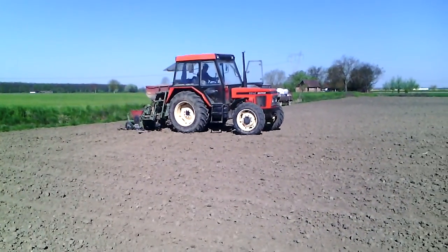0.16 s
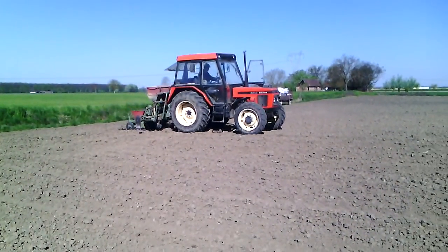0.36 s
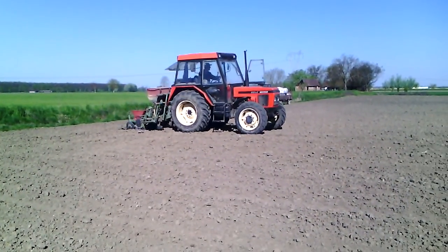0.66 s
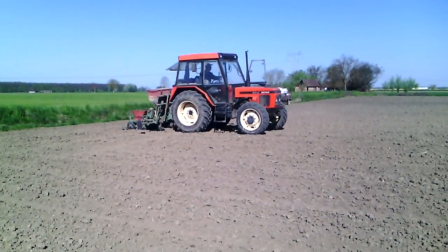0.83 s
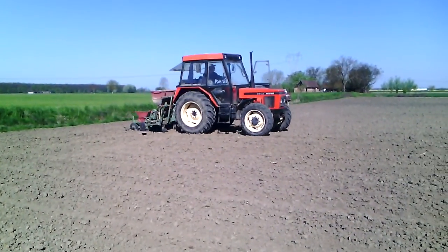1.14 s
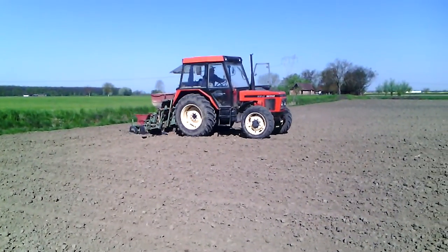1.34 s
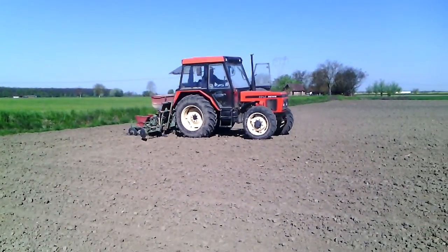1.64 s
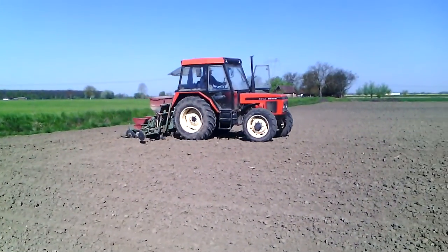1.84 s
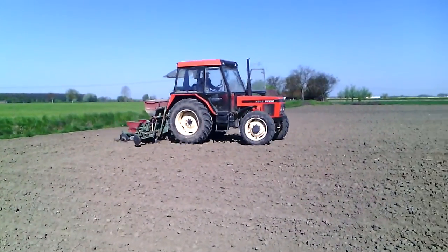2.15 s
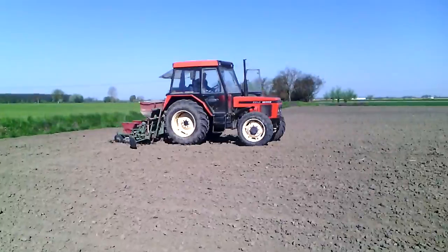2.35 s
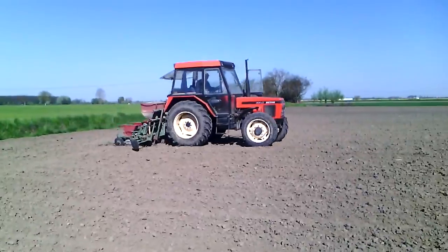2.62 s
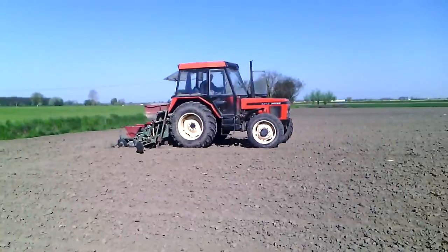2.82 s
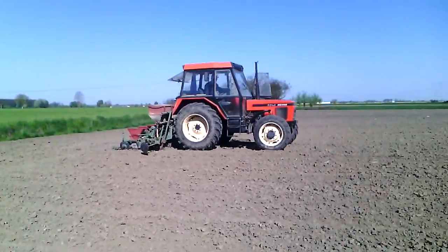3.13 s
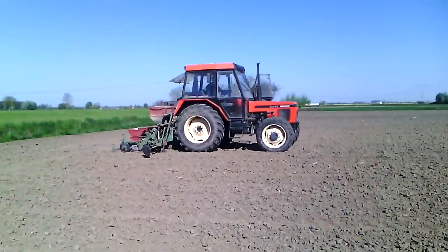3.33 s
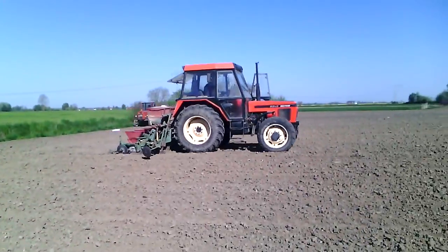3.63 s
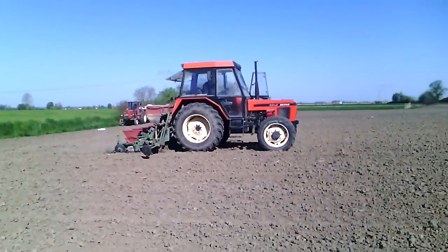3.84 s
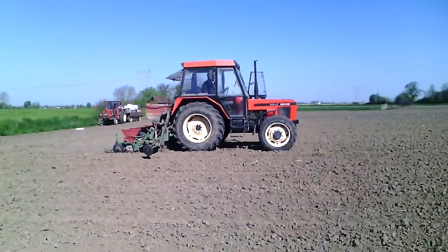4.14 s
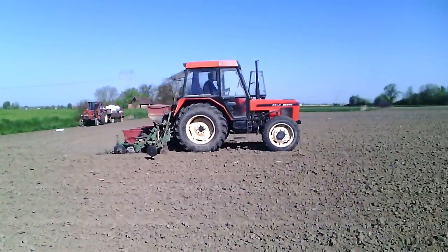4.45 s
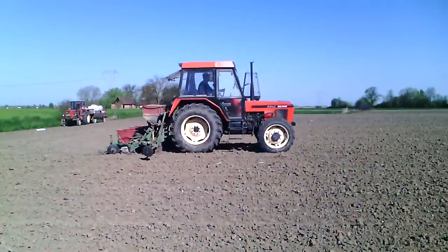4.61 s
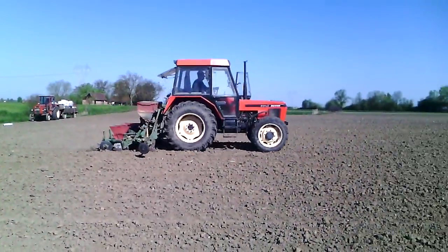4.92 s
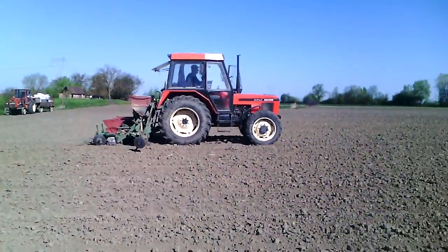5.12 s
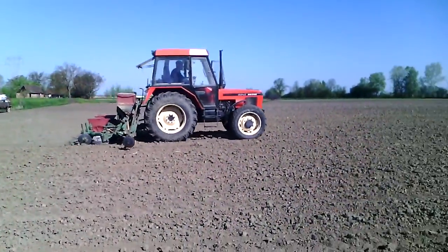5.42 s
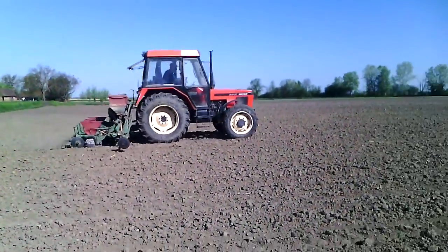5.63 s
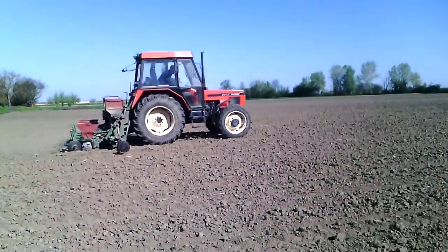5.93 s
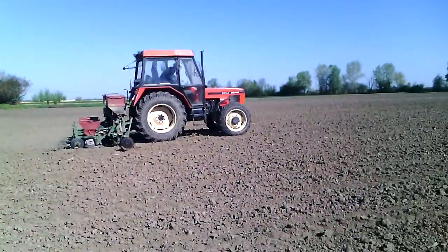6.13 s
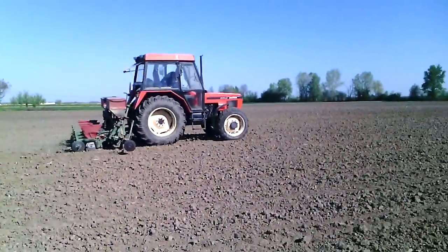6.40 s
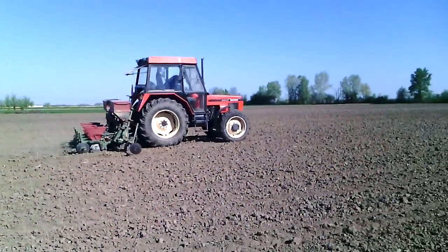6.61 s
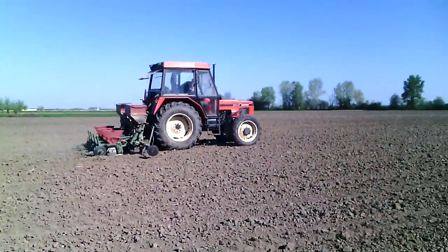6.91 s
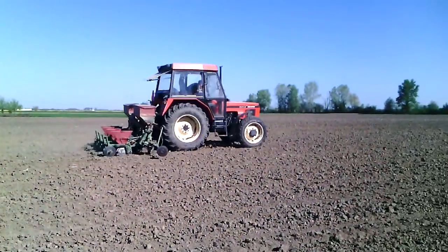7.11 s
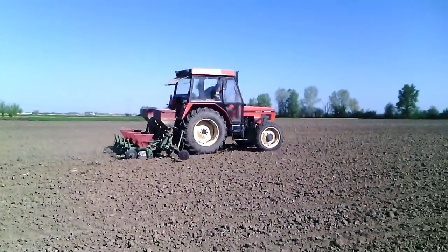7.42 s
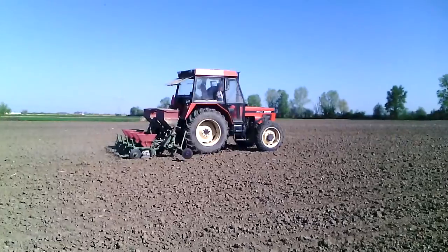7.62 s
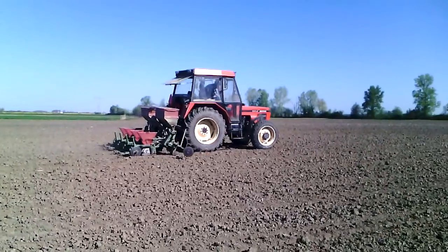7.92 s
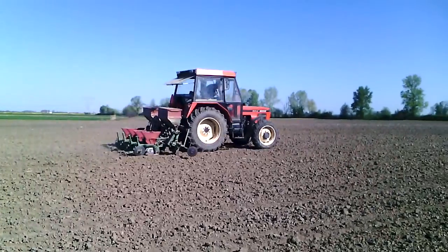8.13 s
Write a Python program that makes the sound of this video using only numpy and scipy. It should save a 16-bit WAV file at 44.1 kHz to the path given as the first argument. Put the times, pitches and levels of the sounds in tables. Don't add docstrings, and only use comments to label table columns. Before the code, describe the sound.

A diesel tractor dips in revs, then pulls hard across a field while its planter clanks, squeaks and rings with bright steel knocks.

```python
import sys
import numpy as np
from scipy import signal
from scipy.fft import rfft, irfft, next_fast_len
from scipy.io import wavfile
from scipy.ndimage import uniform_filter1d

SR = 44100
rng = np.random.default_rng(int(sys.argv[2]) if len(sys.argv) > 2 else 0)


def generate_wav(sig):
    pcm = np.round(np.clip(np.atleast_2d(sig).T, -1, 1) * 32767).astype(np.int16)
    wavfile.write(sys.argv[1], SR, pcm)


def level_to_linear(level):
    exponent = np.asarray(level, float) / 20
    return 10 ** exponent


N = 364266

# (time [s], turning rate [Hz], exhaust hum level [dB], load [dB])
ENGINE = [(0.0, 39.2, -55.5, -7), (0.71, 39.1, -56, -7), (1.59, 32.1, -55.5, -4.5), (1.98, 33.5, -54, -4),
          (2.71, 45.0, -49.5, 0), (3.11, 46.9, -50, 0), (4.07, 49.8, -48.5, 0.6), (5.02, 51.2, -48.5, 0),
          (5.8, 50.4, -49.5, -0.5), (6.99, 47.1, -56, -0.96), (8.26, 50.0, -52, 0.9)]
# (multiple of the turning rate [1], level against the second tone [dB])
UPPER_TONES = [(1.5, -28), (2.5, -27), (3.5, -25), (4, -7.5), (4.5, -17), (5, -9.5), (6, -16.5)]


def engine_hum(t):
    second_db = curves(ENGINE, t)[1]
    first_db = layer_db(t, -63, 1.3, 1.3)
    third_db = second_db + layer_db(t, -5, -0.2, -5)
    angle = engine_angle(t)
    wobble = wander(count=len(UPPER_TONES), per_s=12)
    apart = np.array([[-.12], [.12]]) * wander(count=1, per_s=2.5)[0]
    hum = 0
    for k, db in enumerate([first_db, second_db, third_db]):
        hum = hum + level_to_linear(db + 3.0 + 1.1 * wobble[k]) * np.cos((k + 1) * angle + apart)
    for (order, db), w in zip(UPPER_TONES, wobble):
        hum += level_to_linear(second_db + db + 1.5 + 2.35 * w) * np.cos(order * angle + 0.92 * w[::-1])
    thump_s, thump_half_s, thump_hz = 2.755, .03, 45
    surge_db, push_db = 6.2, -43
    lurch = bump(t, thump_s, thump_half_s)
    thump = level_to_linear(push_db) * lurch * np.cos(2 * np.pi * thump_hz * (t - thump_s))
    return hum * level_to_linear(surge_db * lurch) + thump


# (frequency [Hz], level [dB])
ROAR = [(20, -21), (40, -21), (75, -6), (125, -1.5), (190, 1), (250, -3), (330, -10), (450, -17.5),
        (520, -60)]
# (frequency [Hz], level [dB])
CLATTER = [(260, -26), (450, -11.5), (495, -24), (550, 2.5), (655, 1), (1120, 0.5), (1410, -1.5),
           (1570, 0.5), (2420, -7), (2910, -7.5), (3300, -20.5), (4290, -38), (7260, -120)]
# (frequency [Hz], level [dB])
HISS = [(2900, -13.5), (3280, -15), (3710, -7), (5370, -5), (5990, -9.5), (7110, 0.5), (7870, 1.5),
        (9600, -16.5), (10500, -27), (11500, -37), (12300, -30.5), (13300, -30), (14300, -39), (15000, -46)]


def engine_noise(t):
    firing = engine_angle(t) / (2 * np.pi)
    strength = level_to_linear(3.1 * rng.standard_normal(int(firing[-1]) + 1))
    knock = np.exp(-(firing % 1) / 0.24) * strength[firing.astype(int)]

    roar_db = layer_db(t, -52.5, 0.68, 3.7)
    roar = level_to_linear(roar_db - 0.5) * noise(ROAR, patchy_db=2.0, flicker_db=-1.0, size=2048)
    clatter_db = layer_db(t, -47, 0.93, 0.1)
    clatter = level_to_linear(clatter_db - 1.0) * noise(CLATTER, patchy_db=1.5, flicker_db=1.4)
    clatter = clatter * evened(1 + 0.78 * knock)
    hiss_db = layer_db(t, -45.5, 0.84, 3.86) + 4 * bump(t, 0.42, 0.55)
    hiss = level_to_linear(hiss_db - 3.0) * noise(HISS, patchy_db=2.0, flicker_db=2.0, size=256)
    hiss = hiss * evened(1 + 0.29 * knock)

    air = signal.sosfiltfilt(signal.butter(4, 11500, "high", fs=SR, output="sos"), hiss)
    air_db = layer_db(t, 2.5, 0.27, -6) + 7 * bump(t, 5.0, 2.0)

    hood_hz, hood_width_hz, hood_db = 1570, 30, -62
    idling = np.clip((40 - curves(ENGINE, t)[0]) / 3 + 1.0, 0, 1)
    hood = level_to_linear(hood_db) * evened(resonate(clatter * knock ** 2, hood_hz, hood_width_hz)) * idling
    return hood + roar + clatter + hiss + (level_to_linear(air_db) - 1) * air


# (time [s], hum level [dB], whine frequency [Hz])
GEARS = [
    (4.4, -57, 1052),
    (5.7, -57.5, 1092),
    (6.45, -61.5, 1128),
    (7.2, -58, 1100),
    (7.6, -55.5, 1106),
    (8.0, -57.5, 1131),
    (8.26, -49, 1122),
]


def gearing(t):
    hum_db, hz = curves(GEARS, t)
    a, b = rng.standard_normal((N, 2)).T
    hum = level_to_linear(hum_db - 3.5) * evened(resonate(resonate(a, hz / 2, 11.6), hz / 2, 30))

    shaky_phase = 2 * np.pi * 557 * t + .6 * wander(count=1, per_s=29)[0]
    moan = level_to_linear(hum_db + 16.2) * bump(t, 6.97, 0.085) * np.sin(shaky_phase)
    moan = moan * level_to_linear(1.7 * wander(count=1, per_s=36)[0])

    whine_db = -57.5
    waver_db = evened(uniform_filter1d(uniform_filter1d(a, size=5000), size=5000))
    tone = np.sin(2 * np.pi * np.cumsum(hz) / SR)
    fuzz = 0.5 * evened(resonate(resonate(b, hz, 12), hz, 30))
    whine = level_to_linear(whine_db - 2.5 + waver_db) * behind(t) ** 2 * (tone + fuzz)
    return moan + (hum + whine) * np.clip((t - GEARS[0][0]) / 0.41, 0, 1)


# (start [s], length [s], peak level [dB])
LOOSE_SPELLS = [
    (0.038, .245, -29.5),
    (0.322, .065, -30.5),
    (0.45, .04, -32),
    (0.526, .065, -33.5),
    (.6529, .04, -29),
    (0.757, .04, -32.5),
    (.6295, .01, -35),
    (0.706, .04, -38),
]
# (frequency [Hz], level [dB])
PANEL_MODES = [(6300, -1.5), (6540, 4), (7070, -4.5), (7300, -14), (5700, -14), (6900, -4.5), (7800, -19)]


def panel():
    out, t = np.zeros(N), np.arange(1500) / SR
    slaps = []
    for start, length, db in LOOSE_SPELLS:
        turn_s = 1 / curves(ENGINE, start)[0]
        slaps += [(s, db) for s in np.arange(start, start + length, turn_s)]
    for (s, db), chance in zip(slaps, rng.random((len(slaps), len(PANEL_MODES), 2))):
        for (hz, mode_db), (a, b) in zip(PANEL_MODES, chance):
            level = level_to_linear(db + mode_db - 9.4 * b - 60 * t / 0.026) * (1 - np.exp(-t / 0.0011))
            add(out, s, level * np.sin(2 * np.pi * (hz * (1 + 0.029 * (a - b)) * t + a)))
    return out


# (time [s], peak level [dB], time to fade by 60 dB [s])
DISC_BLOWS = [(2.6063, -37.5, 0.13), (2.7, -32.5, 0.097), (2.8929, -23.5, 0.061), (2.9764, -27, 0.14),
              (3.235, -27, 0.15), (3.329, -29.5, 0.16), (3.4168, -33, 0.26), (3.592, -23, 0.04),
              (3.7075, -25, 0.053), (3.7387, -19, 0.13), (3.781, -21.5, 0.055), (3.862, -24, 0.11),
              (3.9448, -16.5, 0.076), (4.044, -35.5, 0.15), (4.122, -24, 0.049), (4.244, -15, 0.074),
              (4.385, -27.5, 0.061), (4.4842, -17.5, 0.039), (4.545, -23, 0.062), (4.628, -28, 0.13),
              (4.973, -17, 0.073), (5.464, -27.5, 0.077), (5.9706, -34, 0.12), (6.4942, -32.5, 0.13),
              (6.5538, -34, 0.15), (6.606, -34.5, 0.2), (6.672, -25, 0.11), (6.839, -35, 0.086),
              (7.027, -26, 0.11), (7.232, -31.5, 0.057)]
# (time [s], peak level [dB], time to fade by 60 dB [s])
DISC_RUBS = [(1.986, -40.5, 0.097), (2.7742, -31.5, 0.17), (2.8707, -36.5, 0.19), (3.0486, -27, 0.17),
             (3.99, -34, 0.11), (4.4287, -37.5, 0.34), (5.065, -36.5, 0.062), (5.735, -39.5, 0.066),
             (7.5272, -29.5, 0.15), (7.605, -34, .115), (7.8413, -39, 0.052)]


def disc():
    disc_hz, doppler_hz, sag_hz_per_db, scatter_hz = 5563, 44, 5, 43
    out = 0
    for rows, fall, rise in ((DISC_BLOWS, 1.6, .004), (DISC_RUBS, 3.5, .012)):
        hits = []
        for (s, db, t60), a in zip(rows, rng.random(len(rows))):
            hz = disc_hz - doppler_hz * behind(s) - sag_hz_per_db * max(db + 24.5, 0)
            hits.append((s, db, hz + scatter_hz * (a - .5), t60))
        out = out + struck(hits, rise=rise, partner=.013, partner_db=-9, chatter=.36, fall=fall)
    return out


# (frequency [Hz], level [dB])
NEIGHBOURS = [(2570, -18), (3470, -31), (3990, -27), (4470, -35), (6560, -18), (6930, -40), (7620, -18),
              (8580, -27)]


def disc_neighbours():
    rows = DISC_BLOWS + DISC_RUBS
    hits = []
    for row, luck in zip(rows, rng.random((len(rows), len(NEIGHBOURS), 2))):
        for (hz, db), (a, b) in zip(NEIGHBOURS, luck):
            if a < .5:
                level = 0.18 * (row[1] + 30) - 24 + db - 14 * a
                hits.append((row[0] + 0.014 * b, level, hz))
    return struck(hits, rise=0.0038, partner=0.016, partner_db=-2.5, chatter=0.16, ring_s=0.081)


# (time [s], peak level [dB], frequency [Hz], hold [s])
LATE_RINGS = [(1.697, -38, 3800, 0.038), (1.68, -47, 5800, 0.07), (4.27, -33.5, 5540, 0.087),
              (4.8, -42, 2080, 0.064), (4.455, -40, 6560, .05), (4.53, -40, 4450, .13),
              (3.3, -45, 8600, .04), (4.7, -44, 5520, 0.096), (4.79, -41, 5500, .05), (4.4, -44, 8600, .05),
              (3.682, -36, 5560, 0.06), (4.975, -36, 3950, 0.06), (4.5, -42, 4000, .08),
              (4.335, -43, 6300, .04), (3.15, -47, 3200, 0.057), (3.33, -47, 4660, .06),
              (3.61, -28, 5530, .06), (3.845, -35, 5550, .05), (5.972, -33, 5620, 0.046),
              (7.78, -41, 3850, 0.046), (.605, -46, 4700, 0.037), (.76, -39, 5300, .04)]


def late_rings():
    return struck(LATE_RINGS, rise=0.0052, partner=.02, partner_db=-9, chatter=0.71, fall=3.2)


# (time [s], peak level [dB], frequency [Hz])
ARM = [(0.6025, -40, 5300), (0.7063, -40, 4900), (0.73, -39, 4730), (0.7846, -40, 5120), (0.83, -39, 5030),
       (2.087, -39, 3820), (2.5217, -40.5, 5300), (2.6219, -40, 4000), (3.2335, -43, 3580),
       (3.3318, -36, 3470), (3.7484, -27.5, 3990), (3.857, -33.5, 4480), (4.248, -26.5, 3900),
       (4.3775, -37, 4000), (4.4862, -33.5, 3870), (4.9608, -40, 3950), (5.0913, -38, 3970),
       (6.0172, -36.5, 4270), (6.149, -40, 4480), (6.617, -40, 3930), (6.7046, -35, 3980),
       (7.0574, -35.5, 4930), (7.21, -41.5, 4530), (7.5313, -35, 3930), (7.651, -44.5, 3480),
       (8.1783, -34, 4522), (5.81, -43, 4500)]


def arm():
    return struck(ARM, rise=0.0018, partner=0.078, partner_db=-22.0, chatter=0.86, ring_s=0.1)


# (time [s], peak level [dB], frequency [Hz])
PLATE = [(2.509, -40.5, 2530), (2.602, -37, 2570), (2.6685, -46, 2680), (2.967, -39, 2770),
         (3.073, -38, 2790), (3.7444, -39, 2570), (4.2559, -35, 2550), (4.382, -36, 2570),
         (4.9783, -34, 2555), (5.0806, -33, 2570), (5.2915, -42, 2570), (5.737, -34.5, 2570),
         (5.969, -38.5, 2630), (6.006, -30.5, 2590), (6.499, -43, 2710), (6.676, -37, 2615),
         (6.837, -46, 2570), (7.2057, -27.5, 2700), (7.4565, -37.5, 2700), (7.529, -40, 2520),
         (7.6565, -42, 2790), (8.185, -31, 2660)]


def plate():
    return struck(PLATE, rise=0.00043, partner=0.0555, partner_db=-9.0, chatter=0.37, ring_s=0.11)


# (time [s], peak level [dB], frequency [Hz])
HOPPER = [(0.6374, -43.5, 1560), (1.0101, -39.5, 1573), (1.4795, -38, 1604), (2.5077, -37.5, 1420),
          (2.602, -35, 1370), (2.7591, -39, 2085), (2.798, -34, 2184), (3.02, -34, 2190),
          (3.057, -31, 2214), (3.2176, -34.5, 2150), (3.3303, -36, 1934), (4.4293, -37, 2100),
          (4.8768, -40, 2110), (5.2939, -34, 2110), (6.4926, -40.5, 1710), (6.6742, -35, 2177),
          (6.8369, -43, 2000), (7.1975, -37, 2220), (7.5537, -39, 1666)]


def hopper():
    return struck(HOPPER, rise=0.0034, partner=0.067, partner_db=-9.5, chatter=0.55, ring_s=0.087)


# (time [s], peak level [dB], frequency [Hz])
CHAIN = [ (4, -48, 7670), (3.8674, -29.5, 7620), (4.4675, -38, 7620), (5.9701, -31, 6450), (6.8, -35, 7610),
         (6.3243, -39, 7600), (6.4, -41, 7570), (6.3, -41, 6930)]


def chain():
    return struck(CHAIN, rise=0.00051, partner=0.027, partner_db=-6, chatter=0.21, ring_s=0.089)


CLANK_S = [1.678, 8.181, 2.917, 4.51, .845, 5.969, 3.425, 6.15]
# (level [dB], tones as (frequency [Hz], level [dB]))
CLANKS = [
    (-36.5, [(3300, -8), (4470, -7), (4650, -9), (5320, -4.5), (7400, -22)]),
    (-35, [(3820, -1), (4860, -7), (5380, 0.5), (603, -7)]),
    (-55, [(12200, -3)]),
    (-40, [(4480, 0)]),
    (-44, [(4150, -4)]),
    (-30.5, [(7620, -2), (8600, -8), (6930, -3.5)]),
    (-37, [(3500, -2), (4000, -2), (4850, -4)]),
    (-42, [(3480, -2)]),
]


def clanks():
    out = np.zeros((2, N))
    for s, (db, modes) in zip(CLANK_S, CLANKS):
        hits = [(s, db + mode_db, hz) for hz, mode_db in modes]
        out += struck(hits, rise=.002, partner=.015, partner_db=-5, chatter=.5, ring_s=.14)
    return out


# (time [s], peak level [dB])
CRACKS = [
    (0.63, -48),
    (.142, -47),
    (.708, -57),
    (5.7, -48),
    (5.8, -47),
    (1.679, -44),
    (3.8, -47.5),
    (4.977, -48),
    (5.3057, -48),
]


def cracks():
    out, t = np.zeros((2, N)), np.arange(4000) / SR
    for (s, db), crack in zip(CRACKS, rng.standard_normal((len(CRACKS), 4000, 2))):
        add(out, s, level_to_linear(db + 18.5 - 60 * t / 0.079) * (1 - np.exp(-t / 0.0011)) * crack.T)
    size = next_fast_len(N)
    colour = level_to_linear(0.99 * read(HISS, np.fft.rfftfreq(size, 1 / SR)))
    return irfft(rfft(out, size) * colour, size)[:, :N]


# (time [s], peak level [dB], frequency [Hz], hold [s])
SQUEAKS = [(.89, -44.5, 5390, 0.17), (.64, -42, 1584, 0.1), (.635, -39, 4260, 0.054),
           (.733, -45, 4140, 0.056), (.79, -42.5, 4950, 0.14), (2.425, -43, 4200, 0.077),
           (2.515, -41.5, 1440, 0.16), (2.525, -49, 5560, 0.13), (2.565, -41, 2760, 0.068),
           (2.625, -39, 4020, .07), (2.67, -41, 2710, 0.06), (2.78, -43, 1430, 0.11),
           (2.865, -41, 2580, 0.076), (2.905, -41, 4000, 0.064), (2.955, -39.5, 3470, 0.055),
           (3.088, -39, 3500, 0.05), (3.1, -39, 4850, 0.1), (3.1, -42, 2760, 0.13),
           (3.24, -40.5, 4050, .12), (3.4165, -37, 2700, 0.14), (3.43, -41, 2060, 0.11),
           (3.86, -41, 2790, 0.069), (3.99, -46, 3830, 0.076), (4.1, -35, 5540, 0.16),
           (4.348, -44, 3980, .11), (4.38, -38, 4830, .05), (5.0, -35.5, 2570, 0.093),
           (5.47, -38, 5530, 0.11), (5.564, -40, 4400, 0.043), (5.72, -38.5, 6560, 0.072),
           (6.005, -40, 4360, 0.065), (8.2, -37, 2680, .16), (6.6157, -39, 2560, 0.053),
           (6.62, -40, 3950, 0.14), (7.03, -40, 7620, 0.082), (7.24, -38.5, 4650, 0.078),
           (7.3, -48, 2800, 0.17), (7.23, -41, 7630, 0.16), (7.5526, -34, 2564, 0.057),
           (7.55, -40, 1650, 0.085), (5.65, -39, 7620, 0.052), (5.81, -39, 7620, 0.086),
           (8.2, -36, 3820, .16), (6.405, -39, 7620, .08), (6.68, -37, 7620, 0.087)]


def squeaks():
    return struck(SQUEAKS, rise=0.01, partner=.015, partner_db=-19, chatter=0.8, fall=3.5)


# (time [s], peak level [dB], frequency [Hz])
TICKS = [(.1261, -43.5, 4250), (.195, -49, 3900), (.2284, -49, 4300), (.2967, -43, 5250), (.403, -48, 5590),
         (.4344, -47, 4210), (.4898, -48, 5520), (.535, -45, 4200), (.6055, -38, 5750), (.708, -37, 5920),
         (.8066, -37, 5140), (.6295, -28, 4920), (1.676, -25, 3830), (.9, -49, 1620), (1.688, -31, 4570),
         (1.7, -44, 4300), (1.787, -44.5, 4220), (2.603, -41, 804), (2.63, -39, 820), (2.6932, -39, 2450),
         (2.8862, -48, 3460), (2.9511, -41, 1884), (3.1636, -37, 4940), (3.2339, -39, 3490),
         (3.3098, -34, 2175), (3.3936, -46, 1970), (3.5592, -49, 2240), (4.1187, -45, 4490),
         (4.7183, -42, 4480), (4.7991, -41, 7620), (4.8879, -39, 7620), (4.8769, -46, 4430),
         (5.294, -47, 3470), (5.74, -45, 3470), (5.9011, -44, 7620), (5.9674, -44, 3500),
         (6.0727, -41, 4300), (6.075, -40.5, 1414), (6.2356, -41, 2670), (6.2348, -43, 3470),
         (6.245, -42, 1700), (6.3199, -51, 2300), (6.3478, -39.5, 3460), (6.43, -43, 3350),
         (6.495, -40, 2040), (6.5, -42.5, 3500), (6.5748, -45, 2210), (6.58, -43, 983), (6.8372, -41, 2200),
         (7.0203, -41, 2700), (7.21, -39, 1750), (7.3, -42, 2250), (7.4289, -45, 2520), (7.592, -45, 2670),
         (7.72, -38, 1580), (7.9983, -43, 7720)]


def ticks():
    return struck(TICKS, rise=0.0011, partner=0.0525, partner_db=-8.5, chatter=0.76, ring_s=0.0564)


# (time [s], peak level [dB], frequency [Hz])
SNAPS = [
    (.6308, -34, 7900),
    (.7076, -33.5, 8070),
    (.733, -35.5, 8070),
    (3.18, -44, 9500),
    (3.18, -51, 11000),
]


def snaps():
    return struck(SNAPS, rise=.0005, partner=.04, partner_db=0.0, chatter=.8, ring_s=0.025)


# (time [s], drag level [dB])
DRAG = [
    (2.35, -63),
    (2.61, -50),
    (2.884, -53),
    (3.262, -43),
    (3.62, -55.5),
    (5.8, -58.5),
    (6.2, -54.5),
    (8.2, -58),
]
DRAGGED_HZ = [1937, 2095, 2160, 2290, 2570, 2700, 3470, 4140, 4300, 4480]


def rattle(per_s=320):
    start, end = DRAG[0][0], DRAG[-1][0]
    hits = []
    for a, b, c, d in rng.random((int(per_s * (end - start)), 4)):
        s = start + a * (end - start)
        hz = DRAGGED_HZ[int(b * len(DRAGGED_HZ))] * (1 + 0.043 * (c - .5))
        db = curves(DRAG, s)[0] - 7.9 * (hz > 3100) - 4.5
        hits.append((s, db - 3.1 * np.log(max(d, .12)), hz))
    return struck(hits, rise=0.003, partner=0.0397, partner_db=-7.5, chatter=0.73, ring_s=0.11)


def scrape(t):
    grit = rng.standard_normal((N, 2)).T * level_to_linear(4.5 * wander(count=1, per_s=45))
    grit = np.array([grit[1] * 0.27 + grit[0], -.6 * grit[0] + grit[1] * .3])
    out = 0
    for hz, drift in zip(DRAGGED_HZ, wander(count=len(DRAGGED_HZ), per_s=14)):
        ring = resonate(resonate(grit, hz, 110), hz, 110)
        out = out + level_to_linear(5.0 * drift - 4.9 * (hz > 3100)) * ring
    return level_to_linear(0.82 * (curves(DRAG, t)[0] + 42) - 44.5) * evened(out) * (t > DRAG[0][0])


# (frequency [Hz], width [Hz], level [dB])
FRAME = [(2077, 310, -4.5), (2570, 150, -24), (3470, 45, -15.5), (3980, 49, -17), (4460, 50, -37),
         (5520, 90, -2.5), (6560, 27, -11), (6930, 26, -4), (7620, 17, -2.5), (8680, 140, -10.5)]


def jingle(t):
    part = rng.integers(0, len(FRAME), N)
    strength = level_to_linear(2.4 * np.minimum(rng.exponential(1, N), 4))
    taps = strength * (rng.random(N) < 600 / SR) * rng.choice([-1., 1.], N)
    out, u = np.zeros((2, N)), np.arange(2048) / SR
    for k, (hz, width, db) in enumerate(FRAME):
        ring = np.exp(-np.pi * width / 2 * u) * (1 - np.exp(-u / 0.0015)) * np.sin(2 * np.pi * hz * u)
        sound = evened(signal.oaconvolve(taps * (part == k), ring)[:N])
        out += level_to_linear(db) * sound * np.array([[1], [(-1) ** k]])
    load_db = np.minimum(curves(ENGINE, t)[2], 0)
    return level_to_linear(-59 + 2.6 * load_db + 0.52 * behind(t) + 5.0) * out


# (frequency [Hz], likeness [0 to 1])
LIKENESS = [(100, 1), (450, 0.92), (1100, 0.97), (1500, 0.77), (2100, 0.75), (2600, 0.37), (5000, 0.31),
            (6600, 0.2), (9000, 0.15), (12500, 0.23), (13600, 0.27), (14200, .3)]


def noise(shape, patchy_db, flicker_db, size=512):
    hop, hz = size // 4, np.fft.rfftfreq(size, 1 / SR)
    frames = N // hop + 5
    a, b, c, d, patches = rng.standard_normal((frames, len(hz), 5)).T
    flicker = evened(uniform_filter1d(patches[0], size=4))
    patches = uniform_filter1d(patches.T, size=4, axis=1)
    patches = evened(uniform_filter1d(patches, size=2800 // hop, axis=0)).T
    same = np.clip(read(LIKENESS, hz), 0, 1)[:, None]
    right = a + 1j * b
    lag_s = (1.15 + 2.5 * behind(np.arange(frames) * hop / SR)) / SR
    early = np.exp(2j * np.pi * hz[:, None] * lag_s)
    z = np.array([same * early * right + np.sqrt(1 - same ** 2) * (c + 1j * d), right])
    inside = (hz >= shape[0][0]) & (hz <= shape[-1][0])
    z *= level_to_linear(read(shape, hz)[:, None] + patchy_db * patches + flicker_db * flicker) * inside[:, None]
    return evened(signal.istft(z, nperseg=size, noverlap=size - hop)[1][:, :N])


def struck(rows, rise, partner, partner_db, chatter, ring_s=.1, fall=1.65):
    out = np.zeros((2, N))
    luck = rng.random((len(rows), 4))
    flutter = rng.standard_normal((len(rows), 200, 2))
    for (s, db, hz, *own), (a, b, c, d), shakes in zip(rows, luck, flutter):
        t60 = min(abs(own[0] if own else ring_s), .45)
        t = np.arange(int(t60 * SR) + 200) / SR
        loud, late = (np.interp(t * 330, np.arange(len(k)), k) for k in shakes.T)
        apart = np.array([[-np.pi * min(hz / 2600, 1) ** 2], [0]]) * (0.26 + .5 * c + 0.15 * late[::-1])
        ring = np.sin(2 * np.pi * (hz * t + a) + chatter * late - apart)
        partner_hz = hz * (1 + partner * (2 * d - 1))
        ring += level_to_linear(partner_db) * np.sin(2 * np.pi * (partner_hz * t + b) - apart * 0.98)
        level = level_to_linear(db - 1.5 - 60 * (t / t60) ** fall) * (1 - np.exp(-t / rise))
        add(out, s, level * (1 + 0.68 * chatter * loud) * ring)
    return out


def engine_angle(t):
    return 2 * np.pi * np.cumsum(curves(ENGINE, t)[0]) / SR


def layer_db(t, full_db, per_load_db, behind_db):
    return full_db + per_load_db * curves(ENGINE, t)[2] + behind_db * behind(t)


def behind(t):
    pass_s, turn_s = 4.54, 1
    return .5 + .5 * np.tanh((t - pass_s) / turn_s)


def resonate(x, hz, width):
    turn = np.exp(2j * np.pi * np.cumsum(hz * np.ones(x.shape[-1])) / SR)
    r = np.exp(-np.pi * width / SR)
    return 2 * (turn * signal.lfilter([1 - r], [1, -r], x / turn)).real


def wander(count, per_s):
    knots = rng.standard_normal((int(N / SR * 100) + 1, count)).T
    width = int(100 / per_s)
    smooth = evened(uniform_filter1d(uniform_filter1d(knots, size=width), size=width))
    return np.clip([np.interp(np.arange(N) * 100 / SR, np.arange(len(k)), k) for k in smooth], -2, 2)


def bump(t, middle, half):
    return np.exp(-((t - middle) / half) ** 2)


def evened(x):
    return x / np.sqrt(np.mean(x ** 2) + 1e-20)


def read(points, hz):
    f, value = np.transpose(points)
    return np.interp(np.log(hz + 1), np.log(f + 1), value)


def curves(rows, t):
    s, *columns = np.transpose(rows)
    return [np.interp(t, s, c) for c in columns]


def add(mix, s, sound):
    part = mix[..., round(s * SR):][..., :sound.shape[-1]]
    part += sound[..., :part.shape[-1]]


def scene():
    t = np.arange(N) / SR
    tractor = engine_hum(t) + engine_noise(t) + gearing(t) + panel()
    steel = disc() + disc_neighbours() + late_rings() + arm() + plate() + hopper() + chain() + clanks()
    small_parts = cracks() + squeaks() + ticks() + snaps()
    dragging = rattle() + scrape(t) + jingle(t)
    return tractor + steel + small_parts + dragging


# (frequency [Hz], left over right [dB])
MICROPHONES = [(1200, -0.5), (1400, -4.5), (3000, 0.5), (4000, -6), (5600, -16.5), (6000, 1), (6500, 2.5),
               (8000, 17.5), (9300, 66), (10800, 42), (11700, 12.5), (13500, -4.5), (14500, 8)]


def band_limit(x):
    return signal.sosfilt(signal.butter(12, 15030, fs=SR, output="sos"), x)


def record(dry):
    size = next_fast_len(N)
    hz = np.fft.rfftfreq(size, 1 / SR)
    ratio = level_to_linear(read(MICROPHONES, hz) * np.clip(hz / 900, 0, 1) ** 2)
    sides = np.array([2 * ratio / (1 + ratio), 2 / (1 + ratio)])
    mix = irfft(rfft(dry, size) * sides, size)[:, :N]
    return band_limit(mix)


dry = scene()
out = record(dry)
generate_wav(out)
```